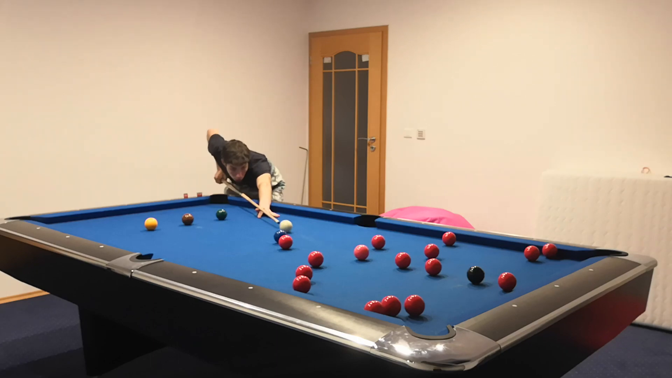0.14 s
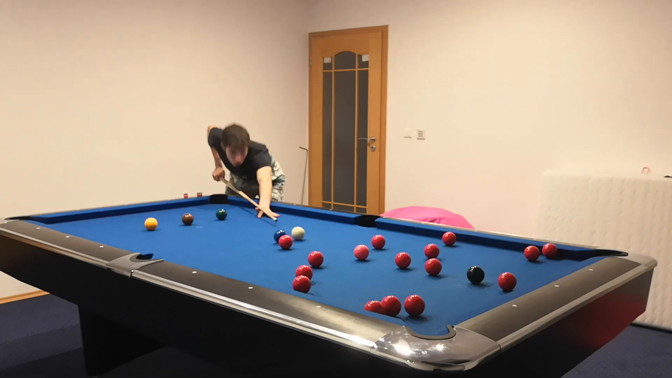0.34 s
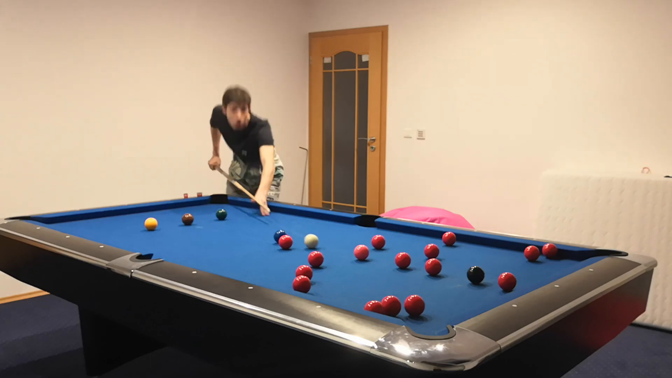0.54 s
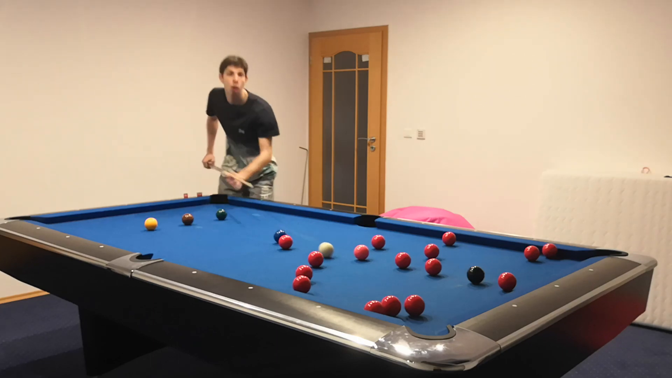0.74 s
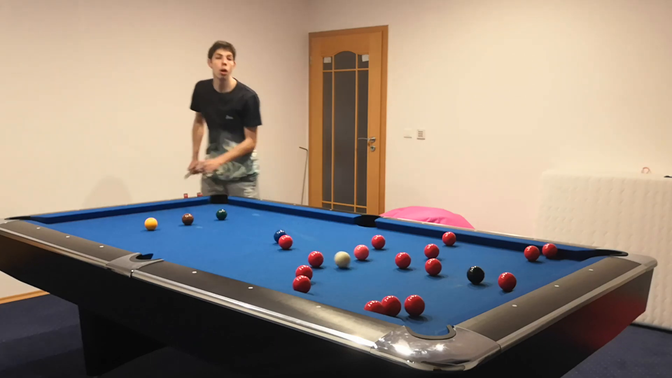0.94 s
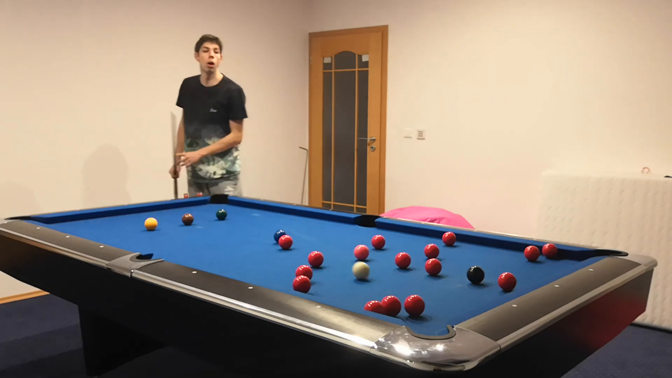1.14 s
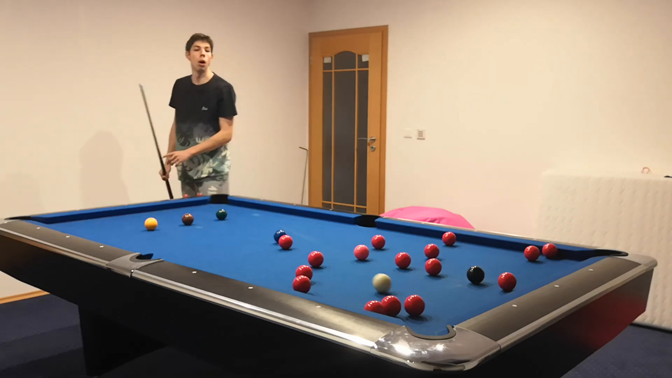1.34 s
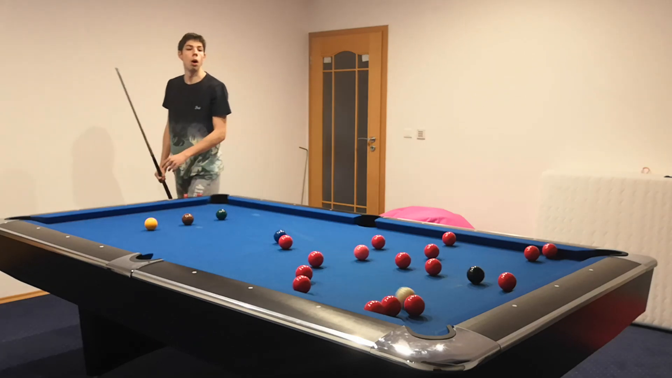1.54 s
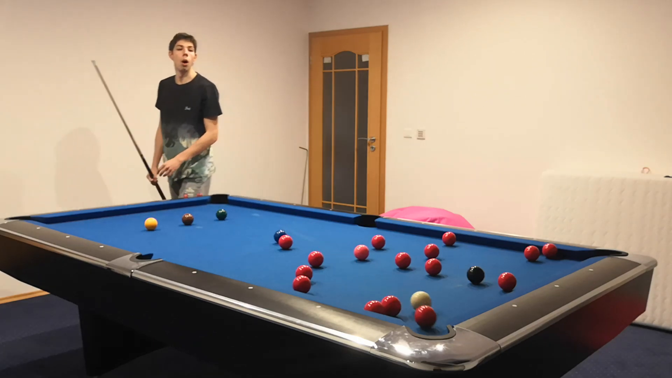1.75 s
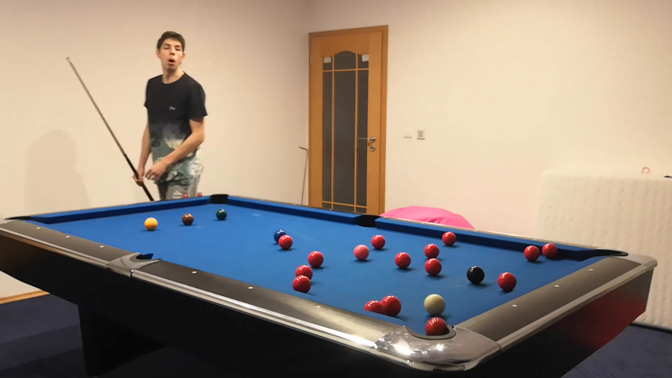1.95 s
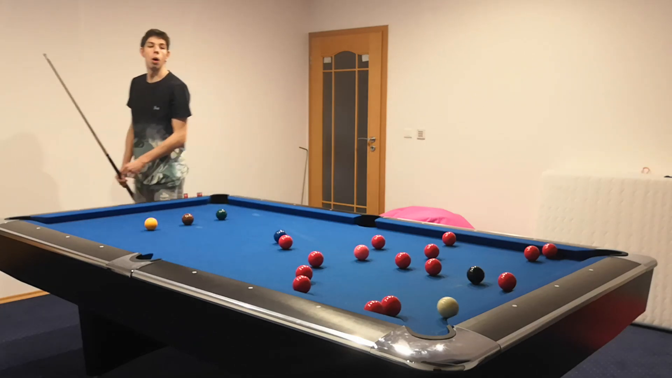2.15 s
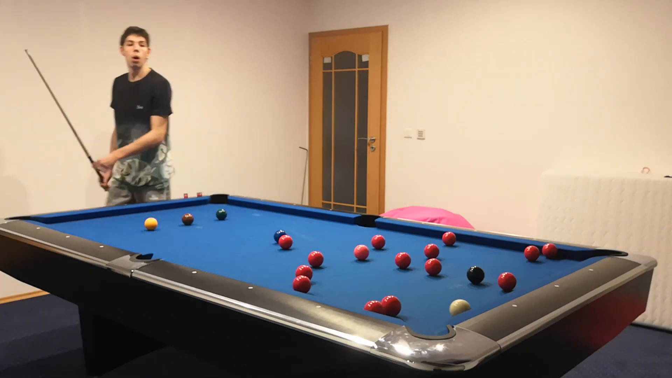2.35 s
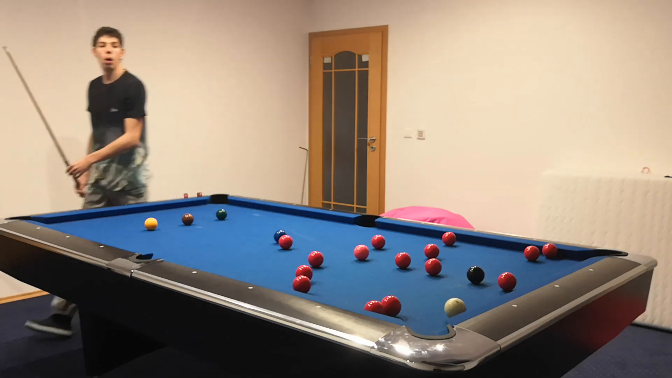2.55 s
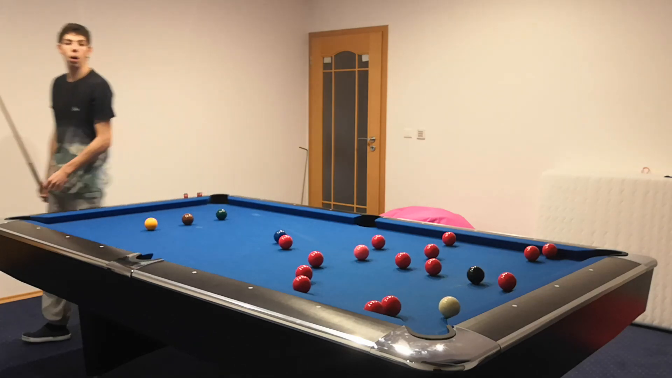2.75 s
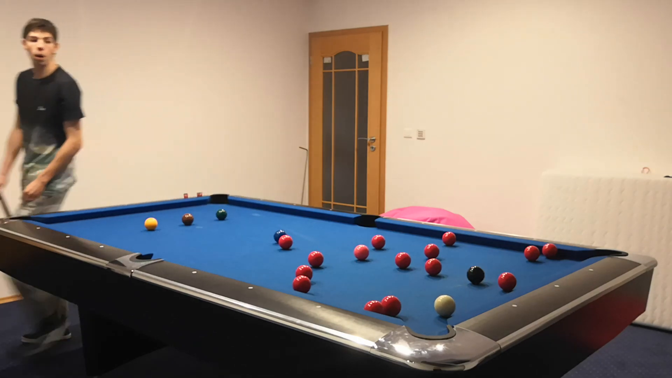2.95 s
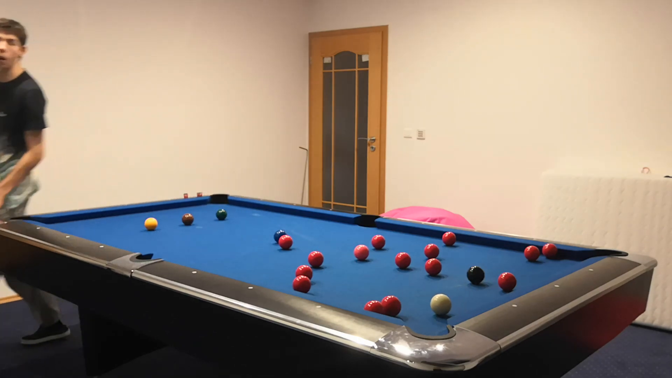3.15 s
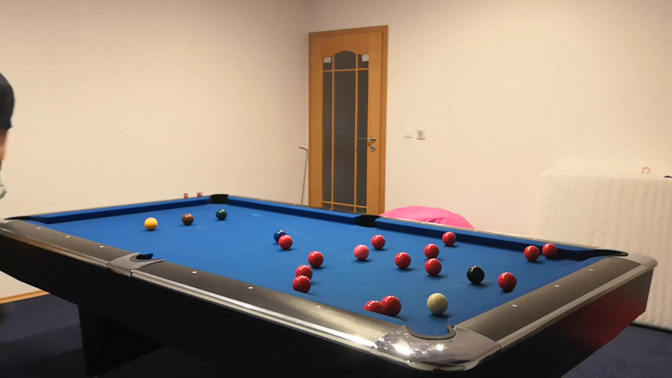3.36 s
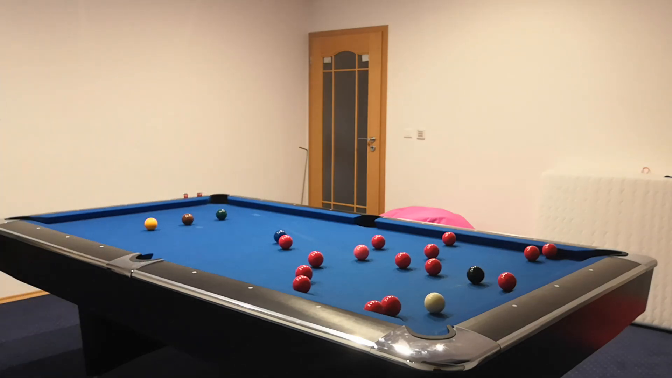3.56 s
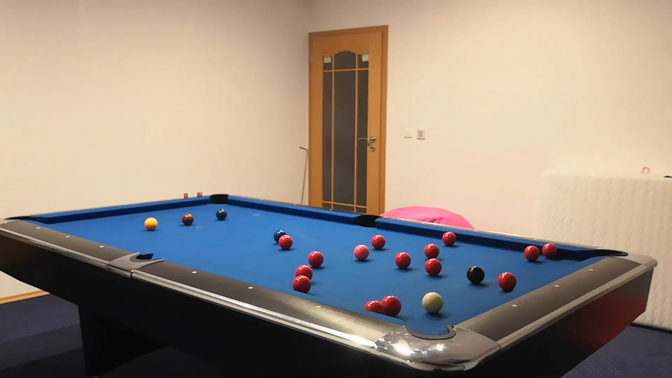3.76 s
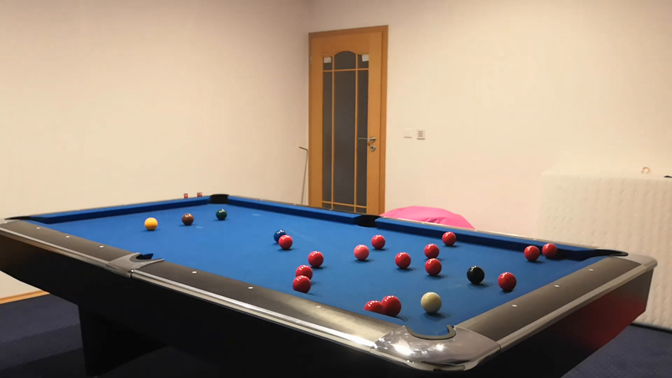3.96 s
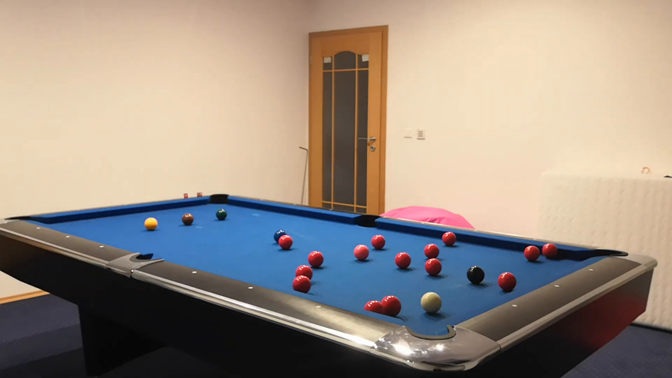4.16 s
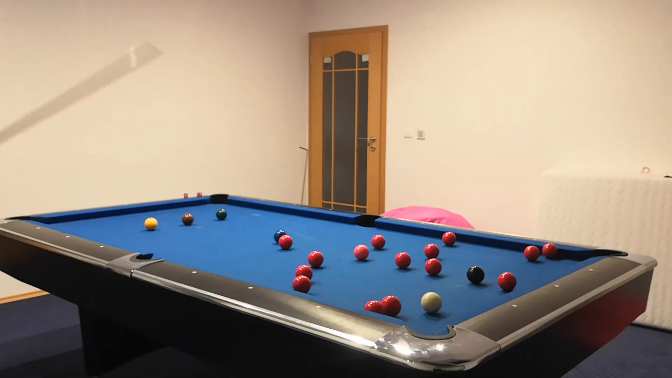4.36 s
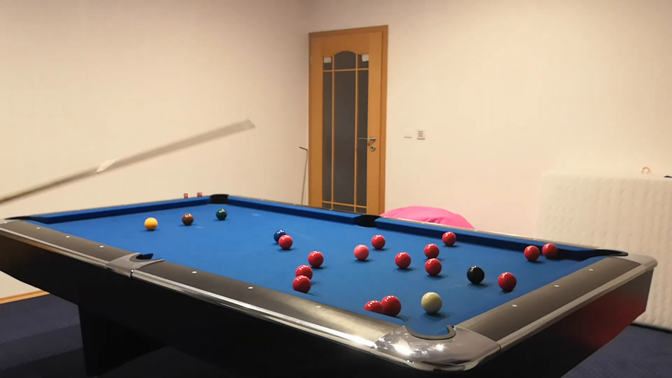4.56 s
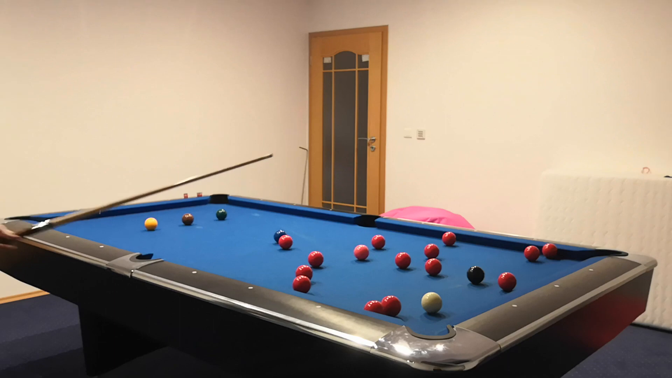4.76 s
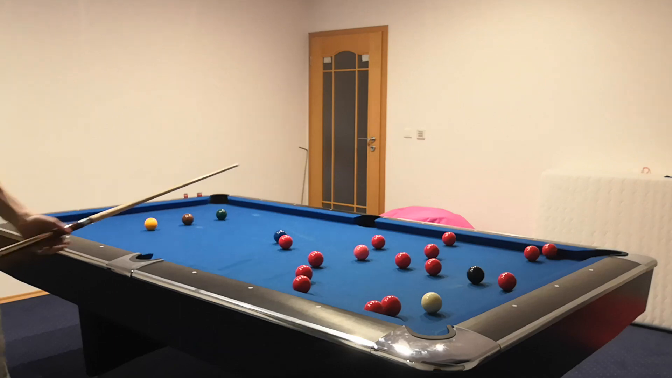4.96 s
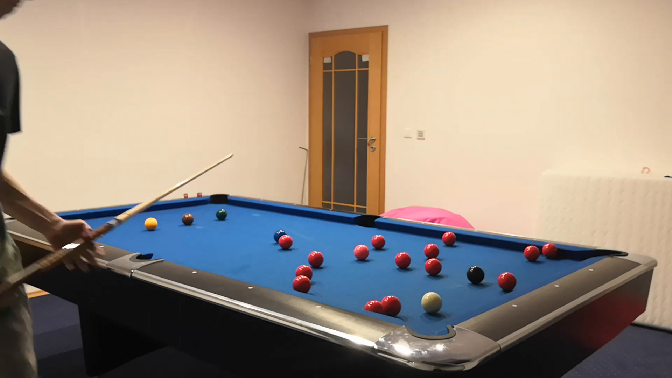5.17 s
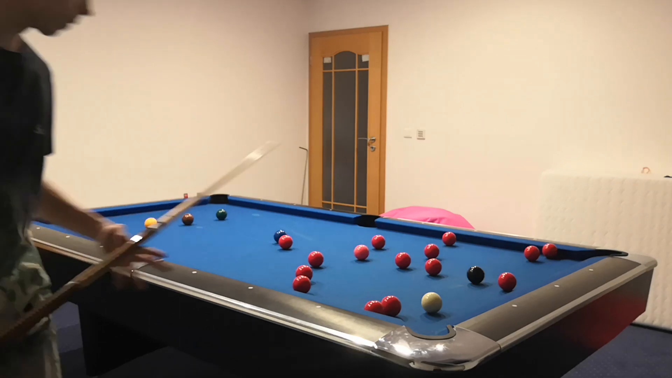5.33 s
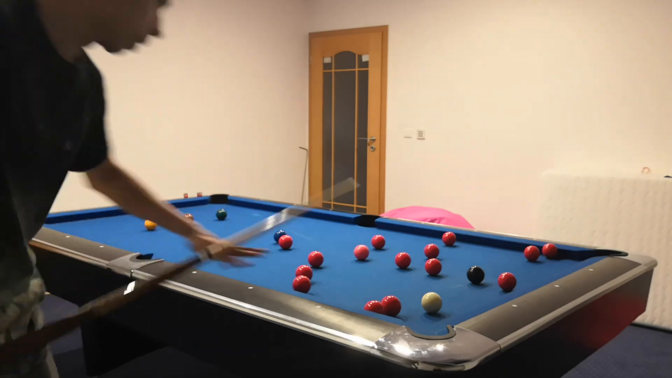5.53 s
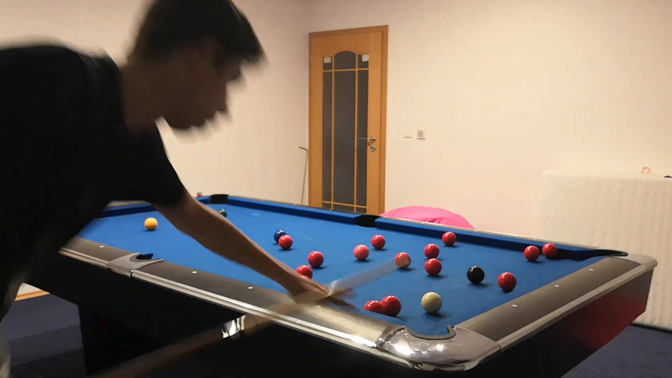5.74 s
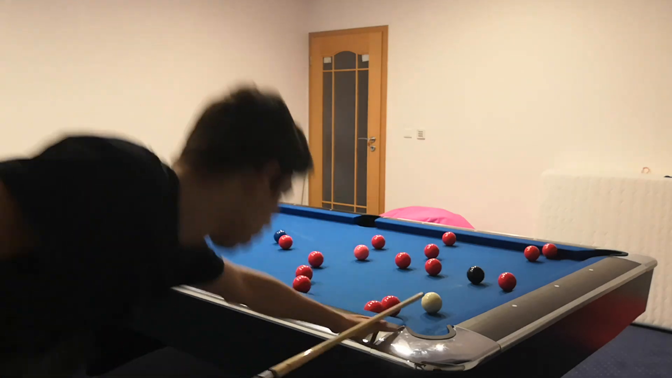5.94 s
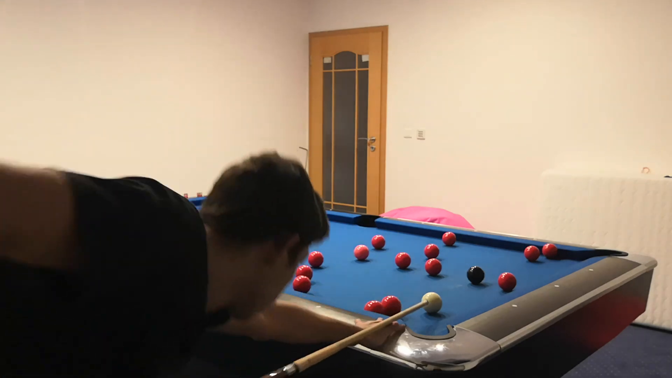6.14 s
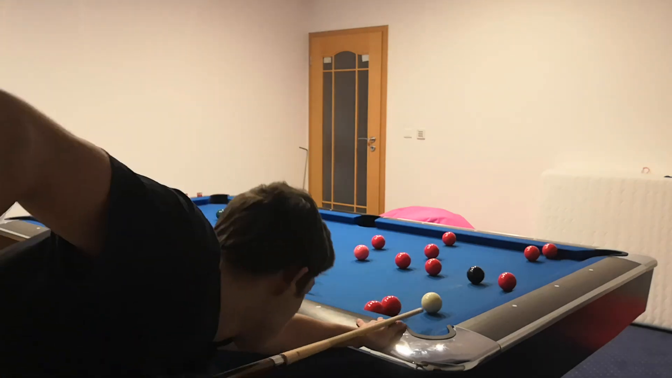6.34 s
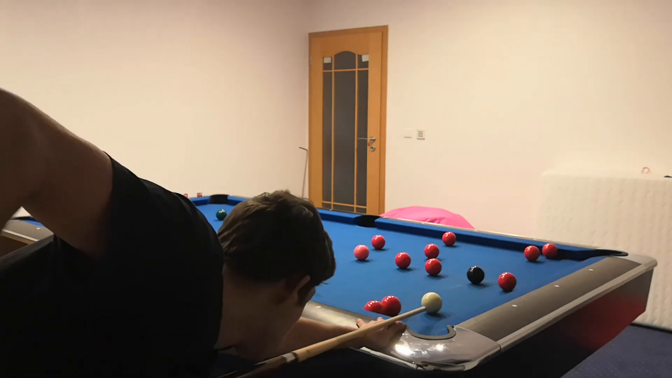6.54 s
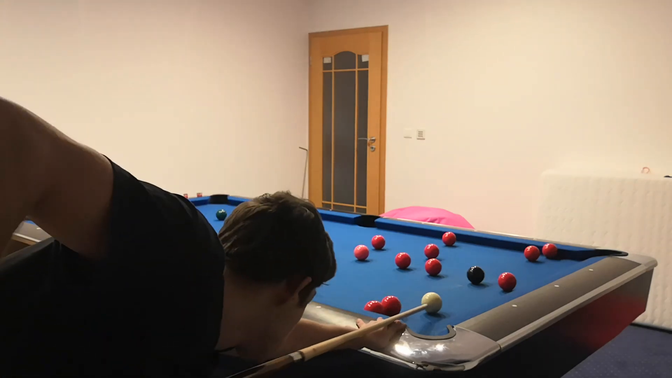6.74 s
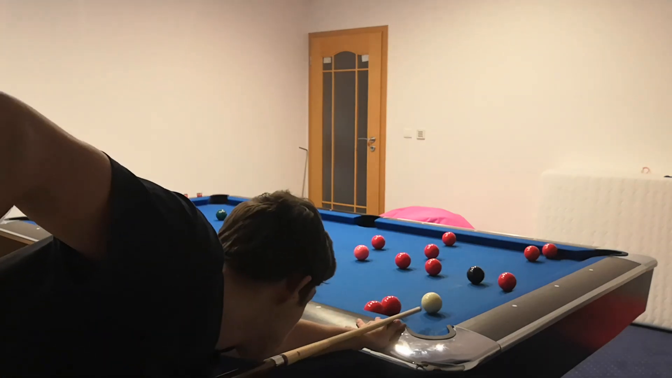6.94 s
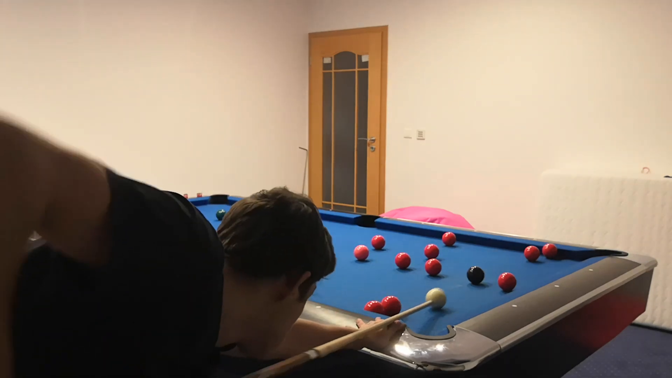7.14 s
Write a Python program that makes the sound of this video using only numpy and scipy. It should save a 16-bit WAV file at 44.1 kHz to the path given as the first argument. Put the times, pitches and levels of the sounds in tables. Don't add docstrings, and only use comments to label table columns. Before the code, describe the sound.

In a small bare room, a cue taps a ball, it rolls, balls crack hard, one rattles down a wooden return, then footsteps and another shot.

```python
import sys
import numpy as np
from scipy import signal
from scipy.fft import rfft, irfft, next_fast_len
from scipy.io import wavfile
from scipy.ndimage import uniform_filter1d

SR = 44100
rng = np.random.default_rng(int(sys.argv[2]) if len(sys.argv) > 2 else 0)


def gain_from_db(level_db):
    decades = np.asarray(level_db, float) / 20
    return 10 ** decades


def digitize_waveform(pressure):
    field = np.atleast_2d(pressure).T
    bounded = np.clip(field, -1, 1)
    quanta = np.round(bounded * 32767).astype(np.int16)
    wavfile.write(sys.argv[1], SR, quanta)


N = 321930
RUN_IN = 8000
OPPOSITE = np.array([[1], [-1]])

# start_s, level_db
ROLLING = [
    (0.2, -73),
    (0.34, -56.5),
    (0.51, -65),
    (0.67, -58.5),
    (0.79, -61),
    (1.12, -58),
    (1.46, -63.5),
    (1.67, -62),
    (1.95, -66.5),
]


def curve_db(rows):
    s, db = np.transpose(rows)
    return np.interp(np.arange(N) / SR, s, db, -120, -120)


def at_hz(points, hz):
    table_hz, value = np.array(points)[:, :2].T
    return np.interp(np.log(hz), np.log(table_hz), value)


def drift(rate_hz):
    knots = rng.standard_normal(1200)
    return np.interp(np.arange(N) / SR * 2 * min(rate_hz, 80), np.arange(1200), knots)


def filtered(x, order, hz, kind="low"):
    return signal.sosfilt(signal.butter(order, hz, kind, fs=SR, output="sos"), x)


def resonance(x, hz, width_hz):
    r = np.exp(-np.pi * width_hz / SR)
    edge_gain = (1 - r * r) / 2
    return signal.lfilter([edge_gain, 0, -edge_gain], [1, -2 * r * np.cos(2 * np.pi * hz / SR), r * r], x)


def ring(hz, t60_s, size):
    t = np.arange(size) / SR
    return np.sin(2 * np.pi * hz * t) * gain_from_db(-60 * t / t60_s)


def steady(x, window_s):
    return x / np.sqrt(uniform_filter1d(x ** 2, max(round(window_s * SR), 1)) + 1e-12)


def bands(gain, size):
    # band_hz, likeness
    likeness = [(60, .95), (130, .75), (290, .1), (640, -.3), (1400, 0), (15000, 0)]
    out, edges_hz = 0, 22 * 2 ** np.arange(0, 9.6, .5)
    white = rng.standard_normal((2, 2, size))
    for k, (low, high) in enumerate(zip(edges_hz, edges_hz[1:])):
        mid, side = filtered(white[k % 2], 2, [low, high], "band")
        hz = np.sqrt(low * high)
        alike = np.clip(at_hz(likeness, hz), -1, 1)
        out = out + gain(hz) * (np.sqrt(1 + alike) * mid + np.sqrt(1 - alike) * side * OPPOSITE)
    return out


def add(out, s, sound, db, pan_db=0.):
    i = round(s * SR)
    sound = sound[..., :N - i] / np.max(np.abs(sound))
    out[:, i:i + sound.shape[-1]] += sound * gain_from_db(db + OPPOSITE / 2 * np.clip(pan_db, -9, 9))


def snap(ms):
    spread = 0.87
    age = np.arange(4000) / SR * 1000 / max(ms, .2)
    mid, side = rng.standard_normal((2, 4000))
    burst = (mid + spread * side * OPPOSITE) * np.exp(-age) * (1 - np.exp(-age / 0.25))
    burst[:, 6] += 5
    return burst


def bright(x):
    return filtered(x, 2, [3100, 15000], "band")


def cue():
    # start_s, peak_db, crack_db re peak, left_right_db
    strikes = [
        (0.1048, -33.5, -26, 9.5),
        (0.1081, -28.5, -29, -6),
        (0.118, -38, 3, -12),
        (7.205, -47, -27, -11),
        (7.2083, -27, -47.5, 12),
        (7.2118, -27, -0.5, -9.5),
        (7.243, -35.5, -25, 3),
        (7.257, -38, -25, 3),
        (7.271, -34.5, -25, 1),
        (7.29, -39, -25, 3),
    ]
    # mode_hz, level_db, t60_s
    tip_modes = [(403, -12.5, 0.088), (720, -6, 0.038), (990, -4.5, 0.032)]
    # start_s, peak_db, left_right_db
    shaft_rings = [
        (.111, -37.5, -18),
        (.117, -30, 4.5),
        (7.2075, -44, -0.5),
        (7.2122, -29.5, -6.5),
    ]
    # mode_hz, level_db, t60_s
    shaft_modes = [(1500, -18, 0.19), (1577, -9, 0.2), (2028, -2.5, 0.045), (2700, -5, 0.15),
                   (3260, -20.5, 0.026), (3970, -16, 0.03), (4550, -17, .05), (5210, -9.5, 0.03),
                   (5685, -9, 0.034)]
    out = np.zeros((2, N))
    for s, db, crack_db, pan_db in strikes:
        modes = sum(gain_from_db(d + 2 * rng.standard_normal()) * ring(hz, t60_s, 8000) for hz, d, t60_s in tip_modes)
        add(out, s, resonance(modes, 630, 1900), db - 5, pan_db)
        add(out, s, resonance(resonance(snap(5.1), 320, 500), 310, 3660), db - 2.5, pan_db)
        add(out, s, resonance(snap(3.3), 3140, 1400), db + crack_db + 0.5, pan_db)
        add(out, s, bright(snap(1.6)), db + crack_db, pan_db)
    for s, db, pan_db in shaft_rings:
        modes = sum(gain_from_db(d + rng.standard_normal()) * ring(hz, t60_s, 8000) for hz, d, t60_s in shaft_modes)
        add(out, s, modes, db, pan_db)
    return out


def crack():
    crack_s, contact_ms, oversample = 1.6737, .415, 8
    t_ms = np.arange(4800) / SR * 1000 / oversample
    force = np.abs(np.sin(np.pi * np.clip((t_ms - .5) / contact_ms, 0, 1))) ** 1.5
    force = signal.resample_poly(force, 1, oversample)
    wavelet = resonance(np.diff(force), 2200, 3100)
    wavelet = -resonance(resonance(wavelet, 2100, 3000), 1100, 4000)
    wavelet = wavelet + gain_from_db(3) * resonance(wavelet, 1020, 400)
    wavelet = lift_slate(wavelet)
    return out


def crack():
    crack_s, contact_ms, oversample = 1.6737, .415, 8
    t_ms = np.arange(4800) / SR * 1000 / oversample
    force = np.abs(np.sin(np.pi * np.clip((t_ms - .5) / contact_ms, 0, 1))) ** 1.5
    force = signal.resample_poly(force, 1, oversample)
    wavelet = resonance(np.diff(force), 2200, 3100)
    wavelet = -resonance(resonance(wavelet, 2100, 3000), 1100, 4000)
    cloth_lift = gain_from_db(3) * resonance(wavelet, 1020, 400)
    slate_lift = gain_from_db(8) * resonance(wavelet, 680, 220)
    out, s = np.zeros((2, N)), crack_s - .0005
    add(out, s, filtered(wavelet + cloth_lift + slate_lift, 3, 3600), -6.5)
    for lobe_hz, db in [(4200, -41), (7100, -44), (11400, -33)]:
        add(out, s, filtered(np.diff(force, 2), 4, lobe_hz, "high"), db)
    add(out, crack_s, resonance(resonance(snap(22.0), 330, 300), 330, 600), -46)
    return out


def knocks(rows, ms, cycles, body, body_db):
    out = np.zeros((2, N))
    for s, db, hz, crack_db, pan_db in rows:
        hit = snap(ms)
        turns = cycles * max((700 / hz) ** 2, 1)
        top_hz = max(3170, 1.2 * hz)
        add(out, s, filtered(resonance(hit, hz, hz / turns), 4, top_hz), db - 2, pan_db)
        add(out, s, body(hit), db + body_db, pan_db)
        add(out, s, bright(snap(.6 * ms)), db + crack_db - 3, pan_db)
    return out


def wood(x):
    # mode_hz, width_hz, level_db
    panel_modes = [(304.4, 34, -5.5), (349.5, 25, -4), (481.7, 83, 1.5), (613, 40, 6), (1043, 220, 7.5),
                   (1130, 200, 11.5), (1280, 160, -7), (1747, 120, -24.5), (1970, 58, 3), (2640, 570, -2),
                   (3706, 240, -27.5)]
    modes = sum((-1) ** k * gain_from_db(d) * resonance(x, hz, w) for k, (hz, w, d) in enumerate(panel_modes))
    return modes + gain_from_db(1.5) * resonance(resonance(x, 1900, 2600), 2200, 2000)


def pocket():
    # start_s, peak_db, knock_hz, crack_db re peak, left_right_db
    bounces = [(2.055, -43, 1518, -27, 1), (2.077, -40, 3040, 8, -5), (2.2552, -17, 1390, -20.5, -11.5),
               (2.2585, -20, 1970, 3, 8), (2.266, -25.5, 2500, -9.5, 3), (2.272, -31.5, 423, -8.5, 9),
               (2.299, -29.5, 2400, -8, 2), (2.312, -31.5, 1800, -10, 0), (2.352, -33.5, 2300, -8, 2),
               (2.281, -20.5, 3860, 6, -10.5), (2.329, -35.5, 486, -41, 2), (2.45, -36.5, 1164, -4, -12.5),
               (2.5145, -13.5, 1470, -18, -2), (2.5175, -19.5, 2660, -10, 0),
               (2.522, -33.5, 793, -29, -10.5), (2.54, -27.5, 1150, -22, 0), (2.571, -22, 1170, -14, -0.5),
               (2.605, -29.5, 1180, -13, -3), (2.637, -31, 1010, -9, 0), (2.73, -34.5, 1100, -15, -1),
               (2.752, -33.5, 1100, -15, 2), (2.6755, -23, 2140, -5.5, 1), (2.68, -29, 1100, -8.5, 0),
               (2.705, -33.5, 514, 4, -5), (2.713, -33.5, 1250, -1, 6.5), (2.719, -33, 2700, 12, -14.5),
               (2.391, -30.5, 1010, -7.5, 3.5)]
    rim_knock = [
        (2.064, -37.5, 532, -23, -0.047),
    ]
    # time_s, level_db
    trundle = [
        (2.26, -62.5),
        (2.316, -56),
        (2.434, -36.5),
        (2.544, -47),
        (2.664, -34),
        (2.718, -26.5),
        (2.842, -91),
        (2.9, -66.5),
    ]
    # start_s, level_db
    fitting_hits = [
        (2.451, -59),
        (2.571, -60),
        (2.706, -49),
        (2.719, -38),
    ]
    # mode_hz, level_db, t60_s
    fitting_modes = [(8495, 0, .11), (7500, -10, .07), (9250, -8, .07), (4600, -6, .05)]
    out = knocks(bounces, 3.58, 1.4, wood, -6.5) + knocks(rim_knock, 2.2, 3.6, wood, -10.5)
    bumps = (rng.random(N) < 400 / SR) * rng.standard_normal(N) + 1e-18
    rumble = wood(bumps)
    out += rumble / np.sqrt(np.mean(rumble ** 2) + 1e-20) * gain_from_db(curve_db(trundle) - 14.5)
    for s, db in fitting_hits:
        add(out, s, sum(gain_from_db(d) * ring(hz, t60_s, 9000) for hz, d, t60_s in fitting_modes), db)
    return out


def free_rings():
    # start_s, level_db, pitch_hz, t60_s
    thuds = [
        (2.2912, -22.5, 77.8, 0.18),
        (2.382, -29.5, 85, .12),
        (2.564, -32, 78, 0.23),
        (2.643, -28, 77.4, 0.21),
        (2.734, -35, 77.9, 0.47),
        (2.805, -30.5, 80, 0.088),
    ]
    # start_s, level_db, pitch_hz, t60_s
    panels = [(2.256, -33, 476, .5), (2.258, -39, 359, .4), (2.259, -32, 1167, 0.56),
              (2.256, -35.5, 1286, .3), (2.259, -54.5, 1600, .4), (2.257, -48, 2143, .25),
              (2.257, -35, 1948, .25), (2.281, -38, 3200, 0.13), (2.27, -57.5, 2830, .3),
              (2.525, -32.5, 613, .5), (2.517, -36.5, 288, 0.27), (2.517, -40, 357, 0.55),
              (2.517, -41.5, 740, .4), (2.52, -35.5, 1300, .35), (2.515, -48, 1700, .25),
              (2.519, -35, 1920, .3), (2.515, -39.5, 2700, .2), (2.678, -34.5, 476, 0.37),
              (2.679, -43, 330, 0.65), (2.709, -46, 1170, .2), (2.71, -57, 480, .4)]
    boards = [
        (3.9, -54, 1010, .3),
        (4.957, -58, 1100, .3),
        (4.97, -62, 1290, .5),
        (3.893, -48, 810, .12),
        (3.96, -62, 840, .2),
        (4.056, -51, 865, 0.1),
        (3.772, -52.5, 1630, 0.16),
        (3.8, -60, 440, .3),
    ]
    out, t = np.zeros((2, N)), np.arange(20000) / SR
    for s, db, hz, t60_s in thuds:
        add(out, s - .5 / hz, -ring(hz, t60_s, 20000) * np.minimum(t * hz, 1), db, 1.2)
    rise = np.minimum(t / 0.0025, 1)
    for s, db, hz, t60_s in panels + boards:
        phase = rng.uniform(0, 2 * np.pi, (2, 1))
        fade = gain_from_db(db - 60 * t / t60_s - 312.5 * t ** 2)
        out[:, round(s * SR):][:, :len(t)] += np.sin(2 * np.pi * hz * t + phase) * rise * fade
    return out


def feet():
    # start_s, peak_db, knock_hz, crack_db re peak, left_right_db
    steps = [(0.674, -53, 1040, -1, 0), (0.843, -58, 1580, -17, 15), (3.249, -61, 910, -8, -17),
             (3.775, -46.5, 1600, -31, 11), (3.895, -34, 1000, -30, -10.5), (3.897, -44, 1900, -20, -4),
             (4.056, -42, 870, -32, -2.5), (4.288, -48.5, 890, -19.5, 4.5), (4.377, -57, 2033, 15, -9),
             (4.558, -53.5, 1260, -17, 0), (4.822, -54.5, 1970, -32.5, -12), (4.868, -44, 1150, -4, -5.5),
             (4.955, -37, 990, 6, 1), (5.081, -43, 1530, -4, 1), (5.184, -39, 2340, -3, -6),
             (5.186, -42.5, 1090, -20, -5), (5.299, -52, 2550, 12.5, -5), (5.343, -43.5, 1060, 18, -3),
             (5.454, -46, 1320, 6, -4.5), (5.549, -55, 1770, 4, -11), (5.607, -49.5, 1130, -8, -2),
             (5.872, -43.5, 1060, -1, -8), (5.928, -38.5, 1950, -33, 0)]
    taps = [
        (3.065, -53, 605, -20.5, 0.5),
        (3.489, -44, 396, -28, -3.5),
        (3.527, -56, 360, -28, 1),
        (3.727, -52.5, 420, -37, -3),
        (4.299, -57, 327, -30, -3),
        (4.39, -51, 413, -30, -1),
        (5.62, -61, 363, -32, -5),
        (5.72, -60.5, 475, -30, -2),
        (5.817, -52.5, 474, -30, -1),
    ]
    sole = lambda x: resonance(x, 3300, 2300)
    return knocks(steps, 3.8, 3.0, sole, -18) + knocks(taps, 1.8, 3.0, sole, -51)


def pulses(times_s, levels_db, rise_s, t60_s):
    power, t = np.zeros(N), np.arange(N) / SR
    for s, db in zip(times_s, levels_db):
        span = slice(max(round(s * SR), 0), max(round(s * SR), 0) + SR // 2)
        age = t[span] - s
        shape = np.clip(age / rise_s, 0, 1) ** 2 * gain_from_db(db - 60 * np.maximum(age - rise_s, 0) / t60_s)
        power[span] += shape ** 2
    return power


def shaking():
    # start_s, floor_db, table_db, cabinet_db
    blows = [(0.105, -78, -46, -47.5), (1.686, -67, -49.5, -48.5), (2.066, -76, -56.5, -63.5),
             (2.269, -55, -36.5, -40), (2.33, -59, -33, -46), (2.44, -46.5, -41, -45),
             (2.521, -57, -38, -46), (2.59, -42, -39, -42.5), (2.681, -42, -35.5, -56),
             (2.78, -40, -41.5, -72), (7.211, -67.5, -47.5, -46)]
    # start_s, floor_db, table_db
    footfalls = [(-0.04, -88, -49), (0.89, -63.5, -74), (1.09, -93, -96), (2.989, -63.5, -79),
                 (3.11, -64, -70), (3.22, -59, -64), (3.37, -61, -69), (3.52, -66.5, -69), (3.66, -65, -80),
                 (3.772, -51.5, -53.5), (3.89, -52, -59), (3.97, -76, -86), (4.071, -82.5, -81),
                 (4.2, -77, -63), (4.279, -56, -55), (4.38, -59, -56.5), (4.521, -64.5, -64.5),
                 (4.81, -50, -57), (4.94, -61, -60), (5.05, -65.5, -89), (5.34, -56, -59),
                 (5.42, -62, -60.5), (5.709, -64, -68), (5.79, -68, -50.5), (5.91, -64, -57.5)]
    blow_rise_s, blow_t60_s = (0.016, 0.0095, 0.028), (0.075, 0.68, 0.56)
    foot_rise_s, foot_t60_s = (0.04, 0.018, 0.049), (0.53, 0.29, 0.74)
    resting_db = (-80, -79, -86)
    blow_s, *blow_db = np.transpose(blows)
    foot_s, floor_db, table_db = np.transpose(footfalls)
    foot_db = floor_db, table_db, table_db - 12.5
    roll_db = curve_db(ROLLING)
    rolling = 0, gain_from_db(2 * (roll_db - 13.5)), gain_from_db(2 * (roll_db - 21))
    gains = []
    for k in range(3):
        power = pulses(blow_s, blow_db[k], blow_rise_s[k], blow_t60_s[k])
        power = power + pulses(foot_s, foot_db[k], foot_rise_s[k], foot_t60_s[k])
        gains.append(np.sqrt(power + rolling[k] + gain_from_db(2 * resting_db[k])))
    return gains


def hum(noise, modes, even_s):
    tone = sum(gain_from_db(d) * resonance(resonance(noise, hz, w), hz, 2 * w) for hz, w, d in modes)
    return steady(tone, even_s)[RUN_IN:]


def lows():
    # mode_hz, width_hz, level_db
    table_modes = [(72, 12, -1.5), (88.6, 39.3, 4), (121, 3.6, -17)]
    cabinet_modes = [(132, 23, 6), (187, 17, 3.5), (222, 32, -18)]
    roll_modes = [(81, 5.6, 5), (115, 9, -10), (149, 5.2, -16.5), (177, 12, -18.5), (214, 6.1, -17)]
    floor_gain, table_gain, cabinet_gain = shaking()
    a, b, c = rng.standard_normal((3, N + RUN_IN))
    table = hum(b, table_modes, 0.066) + gain_from_db(-28) * hum(c, table_modes, .2) * OPPOSITE
    cabinet = hum(b, cabinet_modes, 0.015) + gain_from_db(-15) * hum(c, cabinet_modes, .2) * OPPOSITE
    rolling = gain_from_db(curve_db(ROLLING)) * hum(a, roll_modes, .1)
    floor = hum(a, [(33.4, 4.8, 0)], 0.069)
    return rolling + floor * floor_gain + table_gain * table + cabinet_gain * cabinet


def whistles():
    # start_s, length_s, pitch_hz, width_hz, level_db
    slides = [
        (0.358, 0.35, 1250, 70, -77),
        (5.929, 0.25, 2700, 1310, -66),
        (6.019, 0.34, 1860, 300, -70),
    ]
    out, size = np.zeros((2, N)), 30000
    for s, length_s, hz, width_hz, db in slides:
        white = rng.standard_normal((2, size + RUN_IN))
        tone = resonance(resonance(white, hz, width_hz), hz, width_hz)[:, RUN_IN:]
        age = np.arange(size) / SR / length_s
        level = gain_from_db(db - 30 * np.maximum(age - .6, 0)) * np.clip(age / .06, 0, 1)
        out[:, round(s * SR):][:, :size] += steady(tone, .05) * level
    return out


def friction():
    # start_s, level_db, brightness_db
    scuffs = [(-0.01, -76, -21), (0.838, -75, -9), (3.765, -52, -18), (3.891, -55, -15), (4.09, -73, -17),
              (4.56, -69.5, -12.5), (4.815, -54, -16.5), (4.855, -55, -16.5), (4.949, -50, -12),
              (5.073, -54.5, -19), (5.167, -59, -17), (5.34, -56, -14), (5.45, -64.5, -36),
              (5.597, -68, -18.5), (5.811, -61, -11), (5.87, -59.5, -25)]
    # loudest_s, level_db, brightness_db, swell_s, fade_s
    swishes = [(0.5, -75.5, -6.5, 0.11, 0.39), (0.762, -63, -16.5, 0.05, 0.025),
               (0.916, -64, -13.5, 0.052, 0.074), (1.23, -68, -8.5, 0.065, 0.14),
               (1.43, -69.5, -17, 0.12, 0.032), (3.318, -66.5, -13, 0.28, 0.16),
               (3.7, -67, -14.5, 0.032, 0.45), (4.31, -64, -8.5, 0.096, 0.03),
               (4.4, -57.5, -11.5, 0.042, 0.089), (5.328, -62.5, -9, 0.032, 0.1),
               (5.94, -61, -14, 0.046, 0.13), (6.05, -60.5, -14, 0.24, 0.025), (6.3, -84, -2, 0.42, 0.14)]
    s, db, rel_db = np.transpose(scuffs)
    scuff = pulses(s, db, 0.01, 0.45)
    scuff_sheen = pulses(s, db + rel_db, 0.01, 0.49)
    s, db, rel_db, swell_s, fade_s = np.transpose(swishes)[:, :, None]
    t = np.arange(0, N + 64, 64) / SR
    swish = gain_from_db(2 * db) * np.exp(-2 * np.where(t < s, (s - t) / swell_s, (t - s) / fade_s))
    fine = lambda power: np.interp(np.arange(N) / SR, t, power.sum(axis=0))
    cloth, shine = fine(swish), fine(swish * gain_from_db(2 * rel_db))
    weight = scuff + cloth * gain_from_db(2 * -4)
    return weight, scuff + cloth, scuff_sheen + shine


def air():
    # band_hz, level_db per Hz
    hiss = [(15, -42), (25, -19), (48, -23), (81, -5), (223, -16), (274, -16), (518, -23), (1550, -19),
            (1670, -18.5), (2160, -18), (2640, -23), (8310, -34), (11000, -48.5), (14300, -74),
            (22000, -120)]
    # band_hz, level_db per Hz
    cloth_body = [(120, -27), (200, 2.5), (267, -30.5), (481, 7), (650, -12.5), (1050, 9), (1430, -11),
                  (1910, 8.5), (4000, -15.5), (5200, -42), (8800, -120)]
    cloth_sheen = [(2350, -33), (4000, 14), (6310, -6.5), (7610, 21.5), (8350, -46), (9580, 2),
                   (12000, -14), (15600, -58), (22000, -120)]
    weight, body, sheen = friction()
    gust = drift(10)

    def gain(hz):
        hiss_db = -68.5 + at_hz(hiss, hz) + 21
        if not 150 < hz < 12500:
            return gain_from_db(hiss_db)
        if hz < 4000:
            power, shape = weight if hz < 800 else body, cloth_body
        else:
            power, shape = sheen, cloth_sheen
        rub_db = at_hz(shape, hz) + 7.12 + 2.0 * gust + 2.0 * drift(14)
        return np.sqrt(gain_from_db(2 * hiss_db) + power * gain_from_db(2 * rub_db))
    return bands(gain, N)


def room(x, sag_db_per_s2, tail_db, echo_share, echoes, walls):
    t = np.arange(round(.5 * SR)) / SR
    swell = np.clip((t - .004) / .008, 0, 1)
    colour = np.array(walls)[:, ::2]
    sag_db = sag_db_per_s2 * t ** 2
    answer = bands(lambda hz: gain_from_db(at_hz(colour, hz) - 60 * t / at_hz(walls, hz) - sag_db), len(t))
    answer *= swell * gain_from_db(tail_db)
    for ms, left, right in echoes:
        answer[:, round(ms * SR / 1000)] += np.array([left, right]) * (echo_share if ms else 1)
    return signal.oaconvolve(x, answer, axes=1)[:, :N]


def scene():
    # delay_ms, left_gain, right_gain
    echoes = [(0, 1., 1.), (2.1, .9, .75), (3.35, 1.6, 1.1), (4.8, .7, .6), (6.0, .2, .6), (7.0, .3, 1.2),
              (8.0, .6, .8), (10.3, .45, .5)]
    crack_echoes = [(0, 0.88, 0.89), (2.1, 0.67, 0.6), (3.3, 1.2, 1.25), (3.72, 1.1, .1), (4.85, .6, .45),
                    (5.6, .1, 0.48), (6.5, 0.24, 0.17), (7.0, .1, 1.2), (7.9, 0.54, .7), (10.2, .5, 0.28),
                    (11.3, .3, .1), (12.4, .2, .35)]
    # band_hz, t60_s, tail_db
    walls = [(60, 0.3, -6.5), (244, 0.93, 7), (1090, 0.84, 1), (3240, 0.78, -6), (5950, 0.36, 1.5),
             (10000, 0.3, -2)]
    crack_walls = [(60, 0.3, -5), (244, 1, 4.5), (600, .9, -0.5), (1079, 0.95, 1.5), (1500, .8, -4),
                   (2200, .9, -2), (3260, 0.78, -5.5), (5950, 0.5, 1), (10000, 0.34, -1.5)]
    blows = room(cue(), 426, -32.5, 0.225, echoes, walls)
    blows += room(pocket(), 312.5, -29.5, 0.36, echoes, walls)
    blows += room(feet(), 329, -35.5, 0.28, echoes, walls)
    left_lag = 26
    blows[0, left_lag:] = blows[0, :-left_lag].copy()
    clash = room(crack(), 248, -27.5, 0.74, crack_echoes, crack_walls)
    return clash + free_rings() + blows + lows() + air() + whistles()


def top_cut(x):
    return signal.sosfilt(signal.butter(12, 15620, fs=SR, output="sos"), x)


def record(dry):
    # band_hz, level_db
    capsule = [(9300, 0), (9900, -5), (10400, -13), (11000, -14), (11600, -21), (13000, -20),
               (15500, -24.5)]
    size = next_fast_len(N)
    hz = np.arange(1, size // 2 + 2) * SR / size
    dull = irfft(rfft(dry, size) * gain_from_db(at_hz(capsule, hz)), size)[:, :N]
    heard = dull + gain_from_db(-81) * rng.standard_normal(dry.shape)
    return top_cut(heard)


dry = scene()
out = record(dry)
digitize_waveform(out)
```